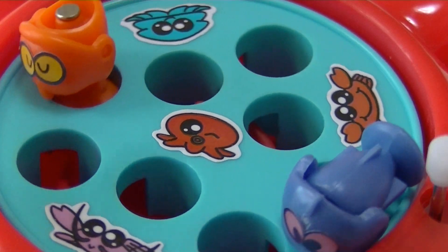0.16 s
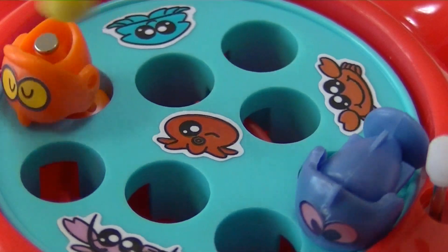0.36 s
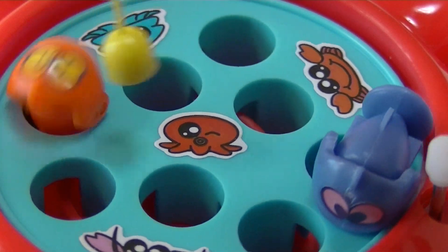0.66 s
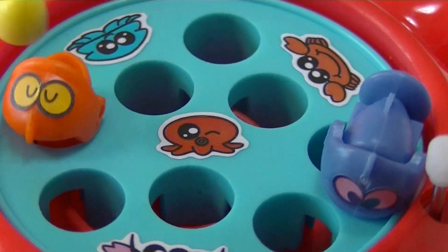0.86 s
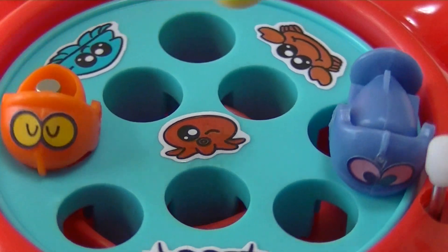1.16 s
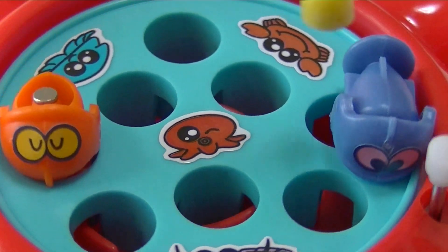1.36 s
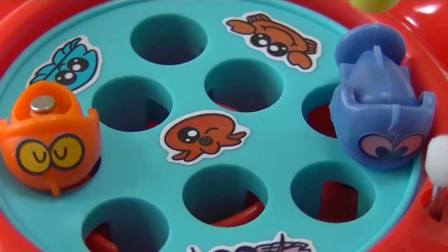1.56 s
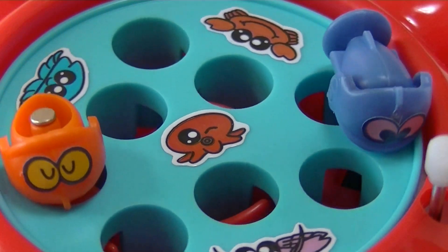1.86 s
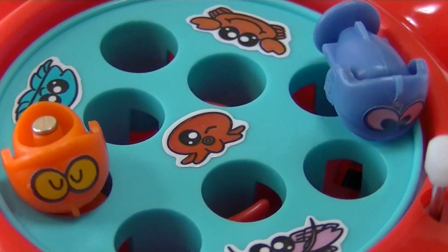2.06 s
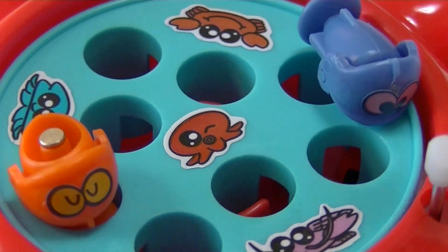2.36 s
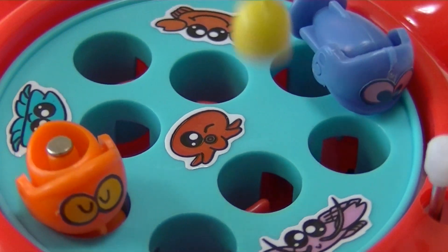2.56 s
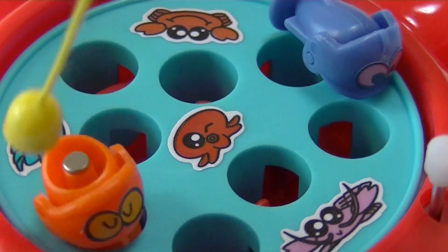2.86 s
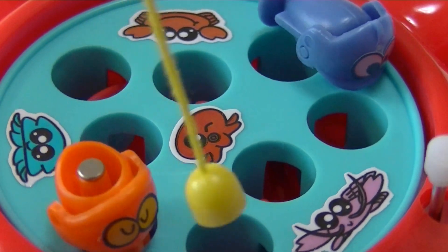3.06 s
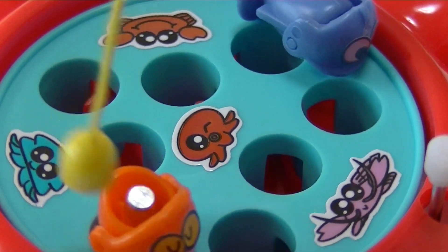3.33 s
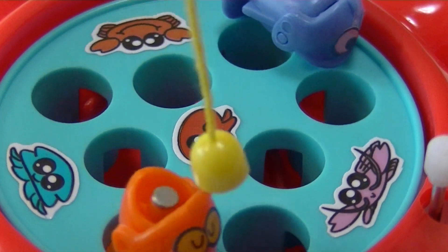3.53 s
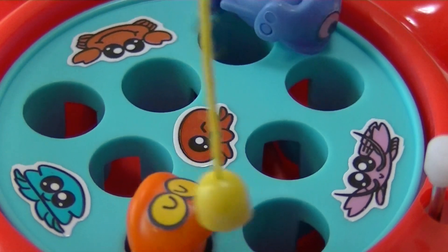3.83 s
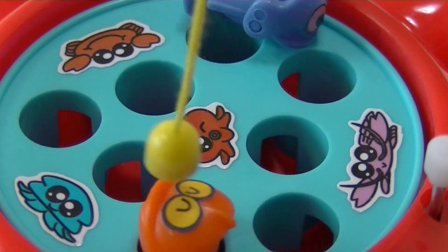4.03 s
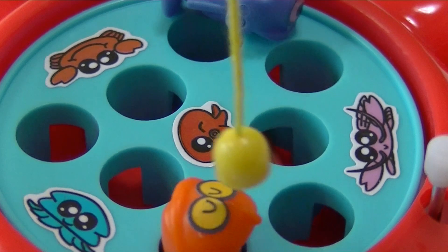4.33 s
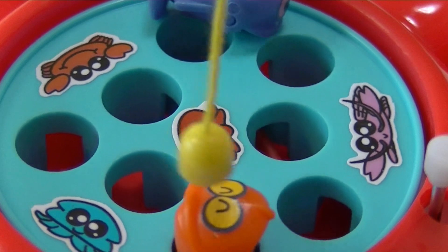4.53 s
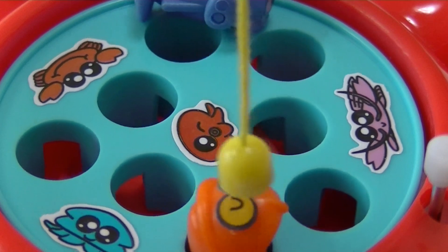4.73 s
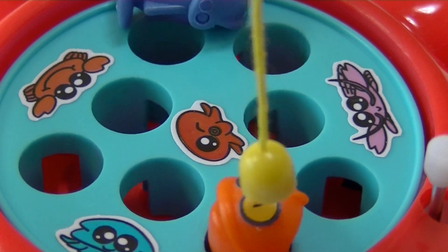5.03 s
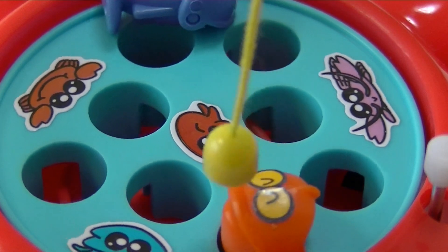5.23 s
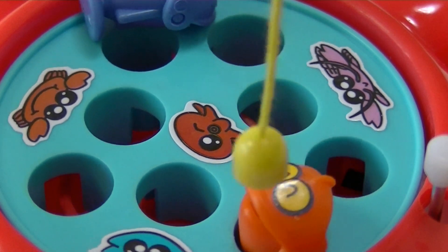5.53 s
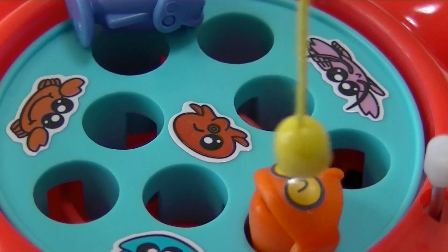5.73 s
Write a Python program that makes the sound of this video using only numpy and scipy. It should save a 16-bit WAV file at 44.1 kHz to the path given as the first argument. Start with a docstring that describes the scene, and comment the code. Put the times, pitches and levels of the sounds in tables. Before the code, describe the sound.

A battery toy fishing pond turns in a small room, heard from close by for about six seconds. From the start its plastic gears knock in a fast, bright, limping rattle that rings the hollow housing, with scattered harder clicks and a soft, grainy whir underneath. At about 0.7 seconds loose plastic fish clatter in their holes, the magnet on the line taps one with a dry tick, and the tub booms softly as they drop back. Around 1.5 seconds the platter drags and the rattle slows. A short scraping clatter and a faint drop come at 2.6 seconds, and the pace briefly picks up. At 3.7 seconds there is another clatter with a sharp magnet tap. From about 4 seconds the gears labour on more slowly and unevenly to the end. A faint low room hum lies beneath everything.

```python
"""A battery toy fishing pond turns on a table in a small room, heard from close by.
From the start its plastic gears knock twice a turn, a fast, limping rattle that rings the hollow housing
over a soft whir. At 0.7 s fish clatter in their holes, the magnet on the line taps one, and the tub booms
softly as they drop back. The platter drags and the rattle slows; a clatter and a drop follow at 2.6 s,
a clatter and a tap at 3.7 s. The gears labour on more slowly to the end, over a faint room hum."""
import sys
import numpy as np
from scipy import signal
from scipy.io import wavfile

SR = 44100
rng = np.random.default_rng(int(sys.argv[2]) if len(sys.argv) > 2 else 0)


def generate_wav(sig):
    """Save sig (samples, or channels by samples) to the path in sys.argv[1] as 16-bit PCM at SR."""
    pcm = np.round(np.clip(np.atleast_2d(sig).T, -1, 1) * 32767).astype(np.int16)
    wavfile.write(sys.argv[1], SR, pcm)


N = 259730
TIME = np.arange(N) / SR
USUAL_TURNS_PER_S, USUAL_KNOCK_DB = 35, -28
# a faster gear knocks harder and brighter and rubs louder (dB for each extra turn per s)
KNOCK_DB_PER_SPEED, BRIGHT_DB_PER_SPEED, RUB_DB_PER_SPEED = .445, .5, .3078

# pace of the knocking gear, sagging whenever the platter drags: time_s, turns_per_s
GEAR_SPEED = [(0.0, 37.93), (0.43, 45.04), (0.53, 40.13), (0.73, 45.45), (1.05, 44.45), (1.28, 45.31),
              (1.48, 30.48), (1.54, 36.13), (1.75, 32.59), (2.29, 33.43), (2.35, 29.81), (2.89, 38.75),
              (3.13, 36.49), (3.45, 44.0), (3.55, 33.54), (3.66, 38.54), (4.05, 30.33), (4.28, 31.99),
              (5.22, 29.09), (5.63, 34.7), (5.75, 27.13), (5.89, 29.83)]
# load on the gears; the limp is a turn's first knock over its second: time_s, boost_db, limp_db
GEAR_LOAD = [(0.0, 0.5, 5), (0.4, -0.4, -2), (0.9, -1.8, -4), (1.3, -0.3, 2), (1.7, -0.6, 3.5), (2.3, 3, 3),
             (2.85, 3, -4.5), (2.99, -4, 5), (3.12, 1.5, -1), (3.35, -0.7, 1.5), (3.9, -5, 3),
             (4.4, -2.4, 2.5), (4.92, 0, -2), (5.1, 0, 0), (5.58, 1.3, -6), (5.89, -5, -7.5)]
# accents, the hardest gear knocks: start_s, snap_db, housing_db, shaft_db
HARD_KNOCKS = [(0.106, -19, -27.5, -22), (0.156, -25, -28.5, -25.5), (0.182, -25.5, -22.5, -25),
               (0.257, -25.5, -20, -31), (0.286, -24.5, -30, -28), (0.393, -21.5, -32, -22),
               (0.7822, -21, -28, -29), (0.841, -22.5, -38, -31), (0.929, -21.5, -35, -27.5),
               (1.009, -22, -42, -32), (1.1531, -19.5, -31, -25), (1.2076, -20.5, -34, -37),
               (1.407, -21.5, -28.5, -45), (1.457, -25.5, -27.5, -40), (1.4877, -19, -29, -36),
               (1.519, -23.5, -27, -52), (1.6311, -24, -22, -46), (1.6882, -23, -23.5, -46),
               (1.8119, -23, -28, -37), (1.8712, -23.5, -23.5, -43), (1.933, -25, -25, -31.5),
               (1.9624, -22.5, -40, -34), (1.974, -23, -46, -32), (2.086, -22, -35, -35),
               (2.1767, -20.5, -43, -39), (2.264, -22.5, -31, -30), (2.373, -24.5, -38, -32.5),
               (2.4896, -24, -44, -30), (2.7035, -27.5, -36, -34), (2.7364, -23.5, -28, -28),
               (2.9521, -21.5, -40, -34), (3.0011, -22.5, -41, -27.5), (3.033, -23, -34, -31),
               (3.2556, -22.5, -34, -31.5), (3.516, -24, -28, -28), (3.548, -23, -40, -35),
               (4.034, -23, -39, -26), (4.1654, -25, -48, -34), (4.416, -30.5, -38, -23.5),
               (4.5802, -27, -31, -26.5), (4.7735, -31, -49, -30), (4.906, -25, -42, -24),
               (4.939, -28, -39, -25.5), (5.054, -34, -29, -40), (5.211, -25, -33, -34),
               (5.3754, -25, -32, -32), (5.41, -28.5, -43, -41), (5.4817, -27, -39, -45)]
# how much of a knock reaches each part as the platter turns, relative to its snap: time_s, send_db
HOUSING_SEND = [(0.0, -9.5), (0.7, -7.5), (1.25, -10), (1.6, -2.5), (1.9, -5), (2.45, -11.5), (2.95, -13.5),
                (3.9, -2), (4.8, -10.5), (5.89, -6)]
PLATTER_SEND = [(0.0, -11), (0.25, -7.5), (0.6, 1), (0.85, -4), (1.35, -14.5), (3.0, -12), (3.65, -4.5),
                (4.5, -6.5), (5.89, -10.5)]
GEARBOX_SEND = [(0.0, -8), (0.7, -8.5), (1.15, -5.5), (1.6, -5), (2.3, -9), (2.95, -15), (3.4, -5.5),
                (4.0, -14), (4.9, -6), (5.89, -10.5)]
TOOTH_TIP_SEND = [(0.0, -16), (0.4, -14), (0.8, -22), (1.9, -18), (2.8, -12), (3.5, -19), (4.0, -8.5),
                  (4.7, -14), (5.4, -11), (5.89, -9)]
SHAFT_SEND = [(0.0, -6), (0.32, -2), (0.65, -11.5), (1.5, -17), (2.35, -9.5), (3.15, -9.5), (3.4, -5.5),
              (4.2, -6.5), (4.65, -6), (4.92, -3), (5.25, -9.5), (5.89, -11.5)]
# the ringing voice of each part of the toy: pitch_hz, relative_db, t60_s
GEAR_MODES = [(2444, 0, 0.015), (2790, -2.5, 0.012), (3800, -2, 0.015), (5970, -10, 0.047),
              (7950, -2, 0.044), (8936, 0.5, 0.036), (10240, -4.5, 0.025), (11300, -13, 0.053)]
HOUSING_MODES = [(1030, -18, 0.019), (1060, -2, 0.0085), (1271, 37, 0.025), (1360, -31, .012)]
PLATTER_MODES = [(1757, -2.5, 0.021), (1997, 9.5, 0.012), (2096, 6, 0.019)]
GEARBOX_MODES = [(3340, -3, 0.021), (3493, 1, 0.031)]
TOOTH_TIP_MODES = [(12340, -1, 0.0064), (12900, -2, .007), (13800, 0, 0.0071)]
SHAFT_MODES = [(4455, -4, 0.03), (4655, 4, 0.041), (5004, -1, 0.029), (6840, -3, 0.038)]
FISH_MODES = [(1600, 2, 0.073), (1750, 7, 0.088), (2170, -4, 0.17), (3860, 3.5, 0.17), (4475, 6, 0.1),
              (7010, 7, 0.089), (10440, 8.5, 0.031)]
TUB_MODES = [(245, 4.9, 0.43), (294, 5, 0.23), (324, 5.2, 0.21)]
# tail of a knock's crack: frequency_hz, t60_s
CRACK_DECAY = [(500, .018), (1500, .017), (4000, .015), (8000, .012), (14000, .009)]
# tone colour of the crack, the whir and the room noise: frequency_hz, relative_db
CRACK_COLOUR = [(350, -36), (700, -23), (1100, -12), (1600, 4), (2400, -3), (3400, 4.5), (4800, 0.5),
                (6500, -4.5), (9000, -1.5), (12500, -4.5), (15500, -17)]
WHIR_COLOUR = [(350, -14), (700, -13.5), (1200, 4), (2000, 0.5), (3500, 2.5), (5000, -6), (7000, -9.5),
               (12000, -14.5), (15500, -23)]
ROOM_COLOUR = [(15, -41), (25, -7), (38, -16.5), (92, -6.5), (141, -4), (204, -6.5), (253, -8), (285, -0.5),
               (321, -12), (408, -31), (466, -11), (600, -6.5), (780, -38), (1320, -120)]
# gear rub at the usual speed, swelling where the platter drags: time_s, level_db
RUB_LEVEL = [(0.0, -34), (0.85, -33.5), (1.3, -34.5), (1.65, -36), (2.45, -35), (2.8, -33), (3.0, -36),
             (3.15, -31.5), (3.7, -35), (4.0, -34), (4.9, -33), (5.1, -35), (5.6, -33.5), (5.89, -36)]
# fish scraping and clattering on the platter: start_s, relative_db, centre_hz, t60_s
FISH_SCRAPES = [(0.6888, -15.5, 6500, 0.022), (0.6952, -15, 4000, 0.026), (0.7053, -18, 3800, 0.061),
                (0.723, -21, 2480, 0.031), (0.739, -24, 1540, 0.068), (2.603, -18.5, 3380, 0.077),
                (3.701, -18.5, 6130, 0.13), (3.7105, -19.5, 2500, 0.029), (3.721, -26, 1600, 0.057),
                (3.733, -22, 1400, 0.04)]
# sharp taps of the magnet on a fish: start_s, force_db, pitch_hz, t60_s
MAGNET_TAPS = [(0.71, -3.5, 1940, 0.0095), (3.7382, -1.5, 5740, 0.0033)]
# a fish dropping back into its hole: start_s, force_db
FISH_DROPS = [(.712, -48), (0.749, -40.5), (2.611, -45)]
# tones of the room's hum: pitch_hz, relative_db
HUM_TONES = [(50, -61.5), (74, -64.5), (115, -62.5), (138, -64), (150, -56), (175, -61), (258, -56)]
# stereo width, side relative to mid: frequency_hz, side_db
STEREO_WIDTH = [(30, -4), (90, -3.5), (350, -9), (700, -2.5), (1300, -29), (2800, -11.5), (5000, -7.5),
                (11000, -5.5), (15000, -7.5)]


def gear_motion():
    """The gear's spin: turns made so far, and haste, its turns per second above the usual speed."""
    speed, = in_time(GEAR_SPEED)
    return np.cumsum(speed) / SR, speed - USUAL_TURNS_PER_S


def gear_knocks(backlash_s, backlash_turns, jitter_s, scatter_db, colour_db, slack_db):
    """Two knocks a turn: their samples, and dB rows for snap, housing, platter, gearbox, tips, shaft."""
    turns, haste = gear_motion()
    first = np.interp(np.arange(.2, turns[-1]), turns, TIME)
    # the gear falls back across its backlash, later when it turns slowly
    second = first[:-1] + backlash_s + backlash_turns * np.diff(first)
    second += jitter_s * rng.standard_normal(len(second))
    when = np.sort(np.concatenate([first, second]))
    count = len(when)
    load_db, limp_db = in_time(GEAR_LOAD)
    snap_db = np.interp(when, TIME, USUAL_KNOCK_DB + KNOCK_DB_PER_SPEED * haste + load_db)
    # a slow gear rattles loosely; 12 more turns per s cut the scatter to about a third
    looseness = np.exp(-np.interp(when, TIME, haste) / 12)
    snap_db += scatter_db * looseness * rng.standard_normal(count)
    snap_db += np.interp(when, TIME, limp_db) / 2 * (-1) ** np.arange(count)
    sends_db = [np.interp(when, *np.transpose(send)) + colour_db * rng.standard_normal(count)
                for send in (HOUSING_SEND, PLATTER_SEND, GEARBOX_SEND, TOOTH_TIP_SEND, SHAFT_SEND)]
    level_db = snap_db + np.array([np.zeros(count)] + sends_db)
    hard_s, hard_db, housing_db, shaft_db = np.transpose(HARD_KNOCKS)
    nearest = np.argmin(np.abs(when - hard_s[:, None]), axis=1)
    # a tooth that barely touches leaves slack, so the next one lands hard
    level_db[:, nearest - 1] += slack_db
    level_db[:, nearest] += hard_db - level_db[0, nearest]
    when[nearest], level_db[1, nearest], level_db[-1, nearest] = hard_s, housing_db, shaft_db
    return np.clip((when * SR).astype(int), 0, N - 1), level_db


def tooth_bounce(hits, level_db, max_rebound, delay_s):
    """Each tooth bounces once, splitting its knock into a tight flam; one energy train per level row."""
    lag, strength = rng.random((2, len(hits)))
    later = np.minimum(hits + (delay_s * (lag + .2) * SR).astype(int), N - 1)
    knock_energy = from_db(level_db) ** 2 * SR / 100  # level taken as rms over 10 ms
    rebound = max_rebound * strength ** 2
    energy = np.zeros((len(level_db), N))
    energy[:, hits] += knock_energy / (1 + rebound)
    energy[:, later] += knock_energy * rebound / (1 + rebound)
    return energy


def struck_part(energy, modes, rough, wander_db=1.2):
    """A blow and a short rough slide ring a part's modes, whose strengths wander as the platter turns."""
    blow = np.sqrt(energy) * rng.choice([-1, 1], (2, N))
    slide = rough * fade(energy, t60=.008) * rng.standard_normal((2, N))
    rings = np.zeros((2, N))
    for k, (hz, db, t60) in enumerate(modes):
        mode = rms_one(stereo(ring(blow + slide, hz, t60), hz))
        rings += from_db(db + wander_db * drift(3.2)) * (-1) ** k * mode
    return np.sqrt(energy.mean()) * rms_one(rings)


def thin_lows(x, hz):
    """The low end of the toy's rings thins out below the parts' lowest modes."""
    return signal.sosfilt(signal.butter(2, hz, "high", fs=SR, output="sos"), x)


def plastic_crack(energy, bright_db, knee_hz):
    """The broad snap of plastic on plastic; the treble dies first and rides the brightness curve."""
    bands = noise_bands(300, 16500, count=12, envelope=lambda hz: fade(energy, at_hz(CRACK_DECAY, hz)))
    shelf_db = bright_db - bright_db.mean()
    snap = sum(band * from_db(at_hz(CRACK_COLOUR, hz) + shelf_db / (1 + (knee_hz / hz) ** 4))
               for hz, band in bands)
    return np.sqrt(energy.mean()) * rms_one(snap)


def pinion_whir(teeth_per_turn, grain_db, throb):
    """The meshing pinion: a grainy hiss that throbs with every tooth; rms 1."""
    turns, _ = gear_motion()
    rub = from_db(grain_db * drift(100)) * (1 + throb * np.sin(2 * np.pi * teeth_per_turn * turns))
    bands = noise_bands(300, 16500, count=10, envelope=lambda hz: rub)
    return rms_one(sum(band * from_db(at_hz(WHIR_COLOUR, hz)) for hz, band in bands))


def fish_clatter(spread_octaves, scrape_db, ring_db):
    """Loose fish scrape in short bursts, each with its own pitch and length, and their shells ring."""
    def envelope(hz):
        energy, age = np.zeros(N), TIME[:SR // 4]
        for start_s, db, centre_hz, t60 in FISH_SCRAPES:
            start = int(start_s * SR)
            colour = np.sqrt(3000 / centre_hz) / (1 + (np.log2(hz / centre_hz) / spread_octaves) ** 2)
            energy[start:start + len(age)] += (colour * from_db(db - 60 * age / t60)) ** 2
        return np.sqrt(energy)
    scrape = sum(band for _, band in noise_bands(795, 15400, count=8, envelope=envelope))
    grit = rng.standard_normal((2, N))
    shell = sum(from_db(db) / np.sqrt(t60 * SR) * stereo(ring(grit * envelope(hz), hz, t60), hz)
                for hz, db, t60 in FISH_MODES)
    return from_db(scrape_db) * scrape + from_db(ring_db) * shell


def magnet_taps():
    """The magnet hits hard plastic: a dry tick, gone at once."""
    return sum(ring(click(start_s, db), hz, t60) for start_s, db, hz, t60 in MAGNET_TAPS)


def tub_boom(gain_db):
    """The hollow tub booms softly under a falling fish."""
    force = sum(click(start_s, db) for start_s, db in FISH_DROPS)
    return sum(from_db(db + gain_db) * ring(force, hz, t60) for hz, db, t60 in TUB_MODES)


def room_reverb(x, t60, wall_hz):
    """Sound bounces between close walls: eight feedback delays a side, duller on every round."""
    tail, dull = np.zeros((2, N)), np.exp(-2 * np.pi * wall_hz / SR)
    for k, lag in enumerate((rng.uniform(.007, .04, 16) * SR).astype(int)):
        side, feedback = k % 2, from_db(-60 * lag / SR / t60)
        loop, state = x[side].copy(), [0.]
        for i in range(lag, N, lag):
            echo, state = signal.lfilter([feedback * (1 - dull)], [1, -dull], loop[i - lag:i], zi=state)
            loop[i:i + lag] += echo[:N - i]
        tail[side] += (loop - x[side]) * (-1) ** (k // 2)
    return tail / np.sqrt(8)


def room_tone(noise_db, hum_db, waver):
    """A bed of low room noise and wavering hum, leaning slightly left."""
    bands = noise_bands(25, 600, count=11)
    noise = rms_one(sum(band * from_db(at_hz(ROOM_COLOUR, hz)) for hz, band in bands))
    hum = sum(from_db(db) * np.sqrt(2) * np.sin(2 * np.pi * hz * TIME + waver * hz / 100 * drift(1.5))
              for hz, db in HUM_TONES)
    return (from_db(noise_db) * noise + from_db(hum_db) * hum) * from_db([[.8], [-.8]])


def from_db(db):
    """Decibels to gain."""
    return 10 ** (np.asarray(db) / 20)


def rms_one(x):
    """Scale to rms 1."""
    return x / np.sqrt(np.mean(x ** 2) + 1e-20)


def in_time(rows):
    """Each column of an automation curve at every sample."""
    time_s, *columns = np.transpose(rows)
    return [np.interp(TIME, time_s, column) for column in columns]


def at_hz(points, hz):
    """Read a curve on a log-frequency axis."""
    points_hz, values = np.transpose(points)
    return np.interp(np.log(hz), np.log(points_hz), values)


def drift(rate_hz):
    """Smooth random modulation with a spread of about 1."""
    hop = 40  # samples per control step
    r = np.exp(-2 * np.pi * rate_hz * hop / SR)
    slow = signal.lfilter([1], [1, -2 * r, r * r], rng.standard_normal(N // hop + 2002))[2000:]
    return np.interp(np.arange(N) / hop, np.arange(len(slow)), rms_one(slow))


def stereo(pair, hz):
    """Mid and side to left and right, as wide as that frequency is."""
    return pair[0] + from_db(at_hz(STEREO_WIDTH, hz)) * pair[1] * [[1], [-1]]


def click(start_s, db):
    """A blow one sample long."""
    return from_db(db) * (np.arange(N) == int(start_s * SR))


def ring(force, hz, t60):
    """One mode: a unit click sets a sine of height 1 ringing."""
    r, w = from_db(-60 / (t60 * SR)), 2 * np.pi * hz / SR
    return signal.lfilter([0, np.sin(w)], [1, -2 * r * np.cos(w), r * r], force + 1e-18)


def fade(energy, t60):
    """Amplitude envelope of impacts whose energy dies away exponentially."""
    r = np.exp(-2 * np.log(1000) / (t60 * SR))
    return np.sqrt(signal.lfilter([1 - r], [1, -r], energy + 1e-18))


def noise_bands(low_hz, high_hz, count, envelope=lambda hz: 1):
    """Stereo noise, shaped in time and then split into bands: yields (centre_hz, band)."""
    edges, white = np.geomspace(low_hz, high_hz, count + 1), rng.standard_normal((2, 2, N))
    for k, (low, high) in enumerate(zip(edges, edges[1:])):
        hz = np.sqrt(low * high)
        bandpass = signal.butter(2, [low, high], "band", fs=SR, output="sos")
        yield hz, stereo(signal.sosfilt(bandpass, white[k % 2] * envelope(hz)), hz)


def scene():
    """The mix: one train of gear knocks rings the toy, with whir, fish and room layered around it."""
    _, haste = gear_motion()
    rub_db, = in_time(RUB_LEVEL)
    hits, level_db = gear_knocks(backlash_s=.0058, backlash_turns=.22, jitter_s=.0008,
                                 scatter_db=1.5, colour_db=1.0, slack_db=-3.5)
    energies = tooth_bounce(hits, level_db, max_rebound=.72, delay_s=.0021)
    snap, housing, platter, gearbox, tips, shaft = energies
    rings = from_db(-10.5) * struck_part(snap, GEAR_MODES, rough=2.5)
    rings += from_db(-2.25) * struck_part(housing, HOUSING_MODES, rough=1.18)
    rings += from_db(-3.5) * struck_part(platter, PLATTER_MODES, rough=1.1)
    rings += from_db(-3.5) * struck_part(gearbox, GEARBOX_MODES, rough=.96)
    rings += from_db(1.0) * struck_part(shaft, SHAFT_MODES, rough=1.05)
    rings += from_db(-2.4) * struck_part(tips, TOOTH_TIP_MODES, rough=.8)
    toy = thin_lows(rings + magnet_taps(), hz=765)
    toy += from_db(-3.24) * plastic_crack(snap, BRIGHT_DB_PER_SPEED * haste, knee_hz=6500)
    whir = pinion_whir(teeth_per_turn=9.8, grain_db=3.0, throb=.53)
    toy += from_db(rub_db + RUB_DB_PER_SPEED * haste) * whir
    toy += fish_clatter(spread_octaves=1.4, scrape_db=8.0, ring_db=4.0) + tub_boom(gain_db=-7)
    reverb = from_db(-11) * room_reverb(toy, t60=.25, wall_hz=7100)
    return toy + reverb + room_tone(noise_db=-49.5, hum_db=-3.0, waver=.7)


def record(dry):
    """The microphone dulls above 14 kHz, then the top is cut steeply."""
    dull = signal.sosfilt(signal.butter(6, 14300, fs=SR, output="sos"), dry)
    return signal.sosfilt(signal.ellip(10, .2, 80, 15750, fs=SR, output="sos"), dull)


dry = scene()
out = record(dry)
generate_wav(out)
```